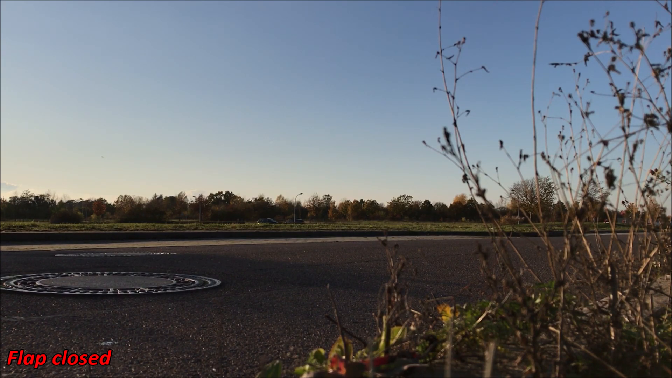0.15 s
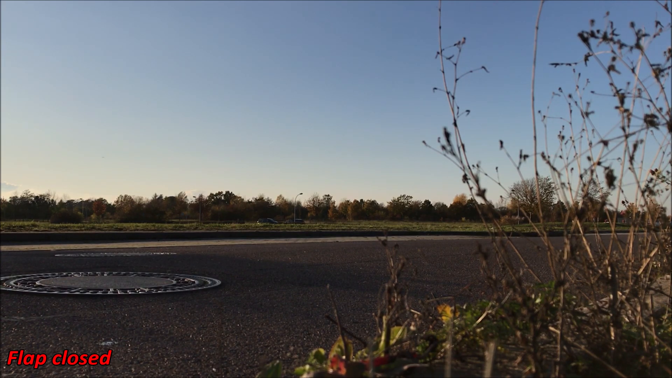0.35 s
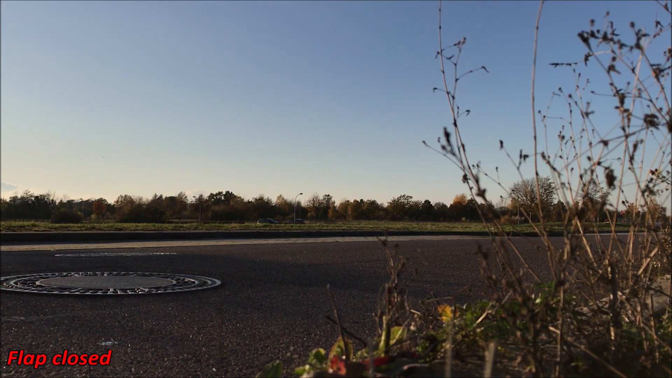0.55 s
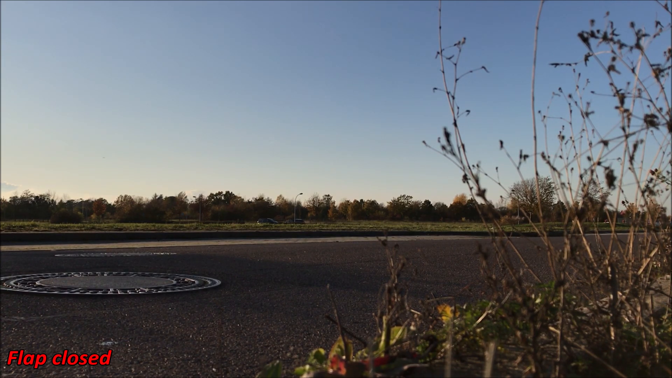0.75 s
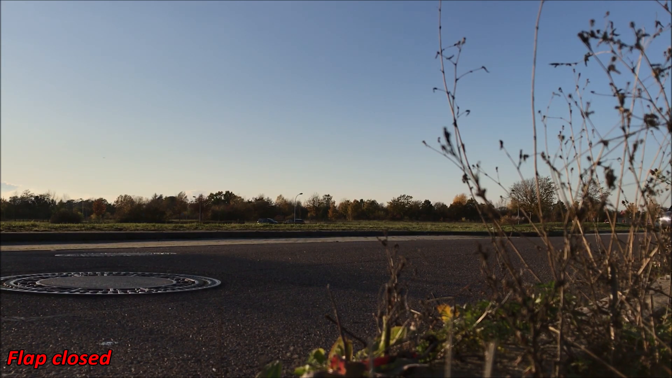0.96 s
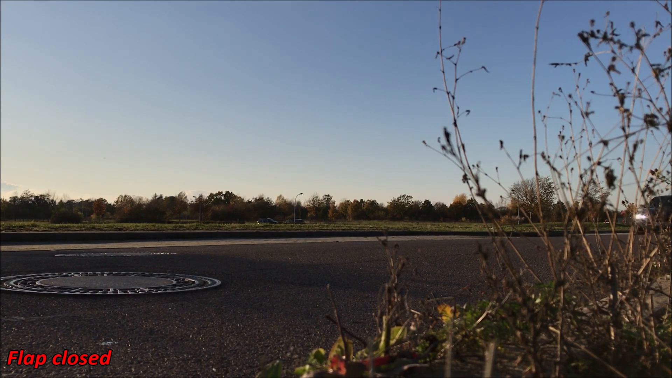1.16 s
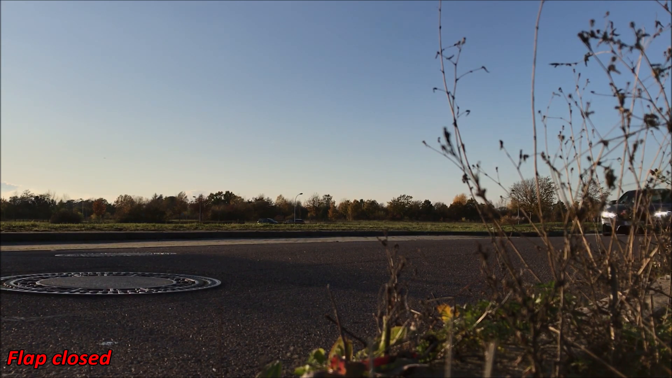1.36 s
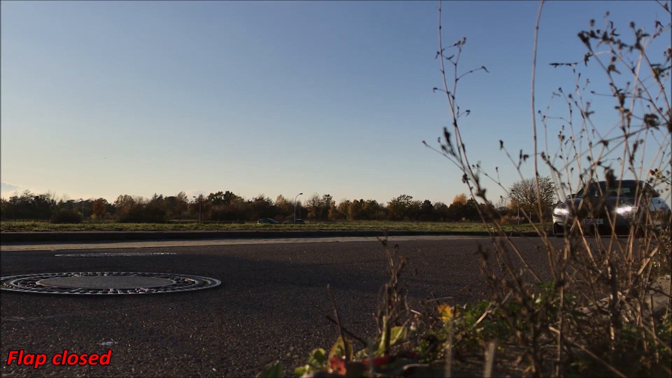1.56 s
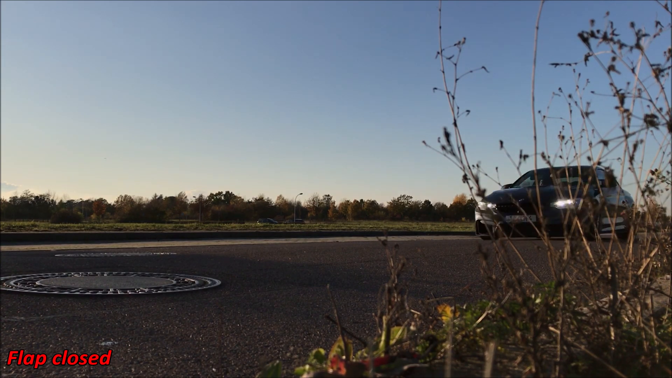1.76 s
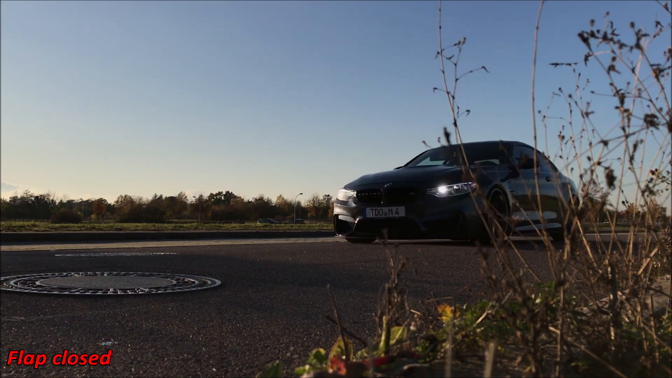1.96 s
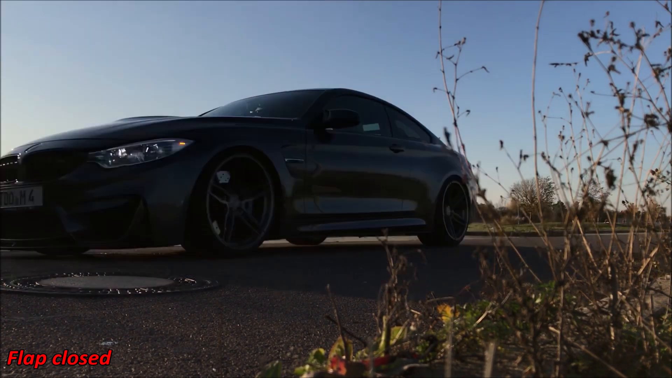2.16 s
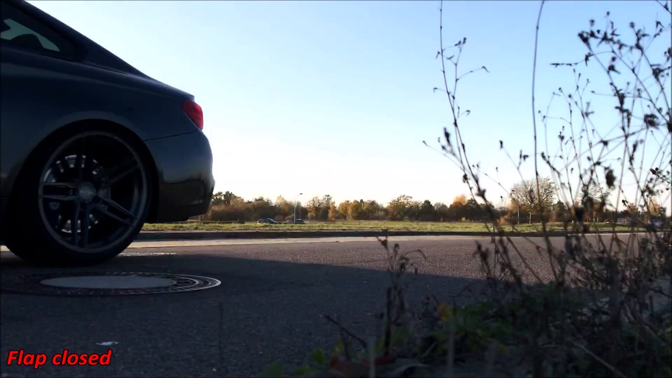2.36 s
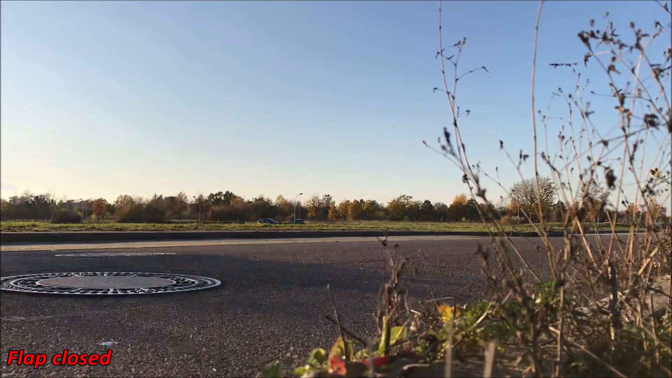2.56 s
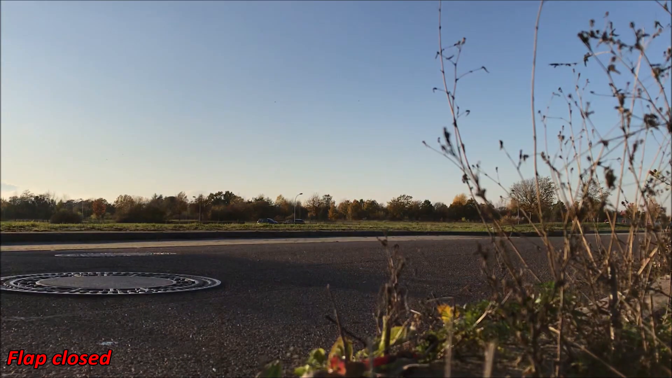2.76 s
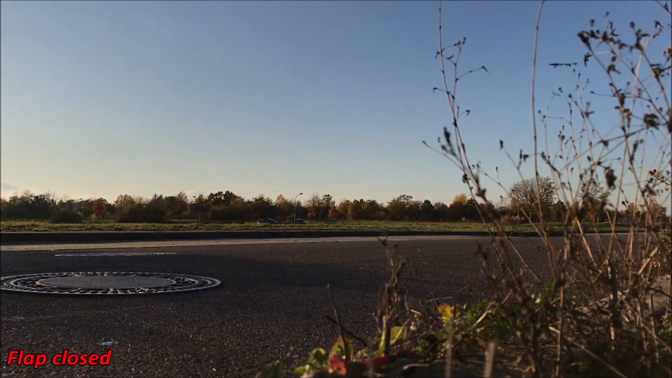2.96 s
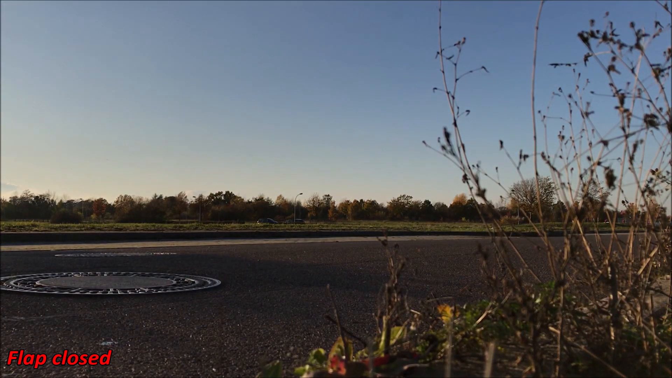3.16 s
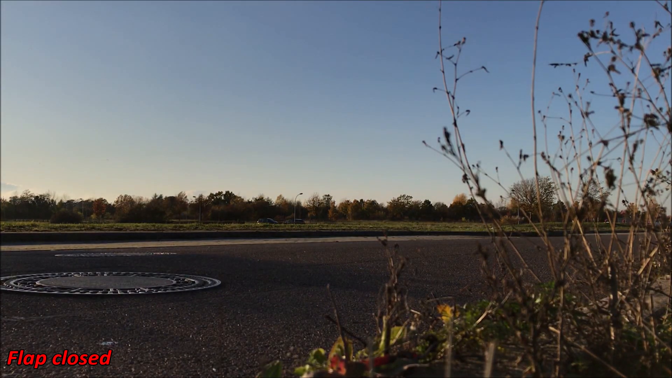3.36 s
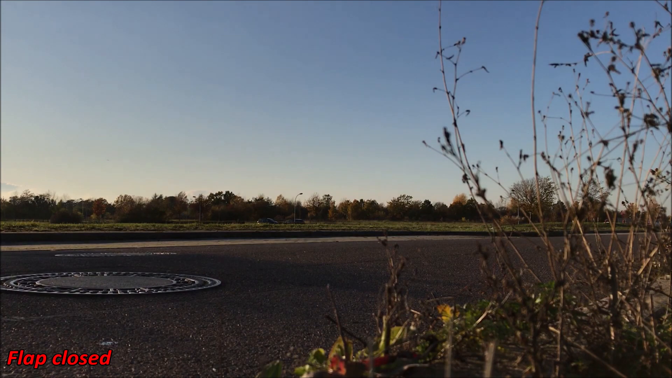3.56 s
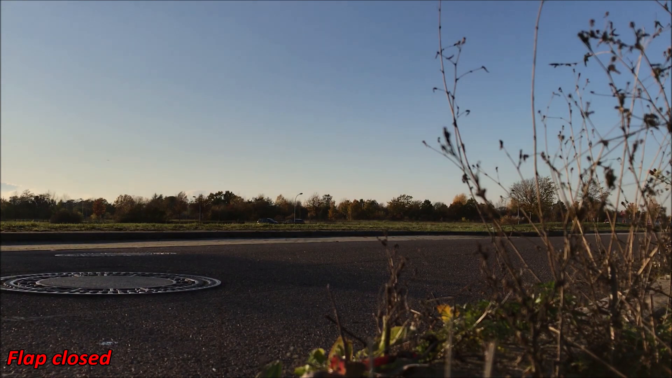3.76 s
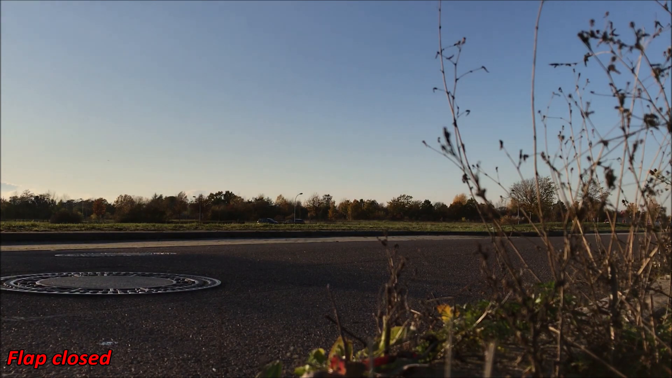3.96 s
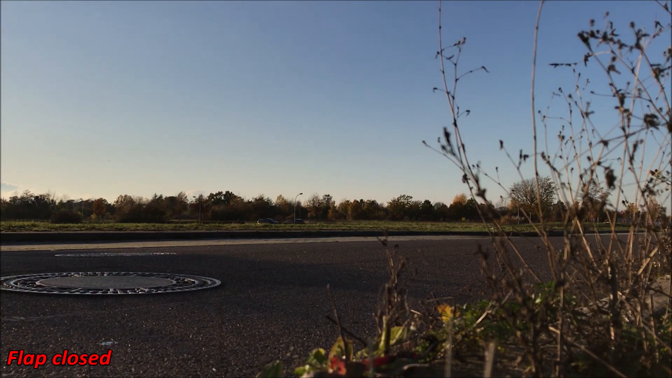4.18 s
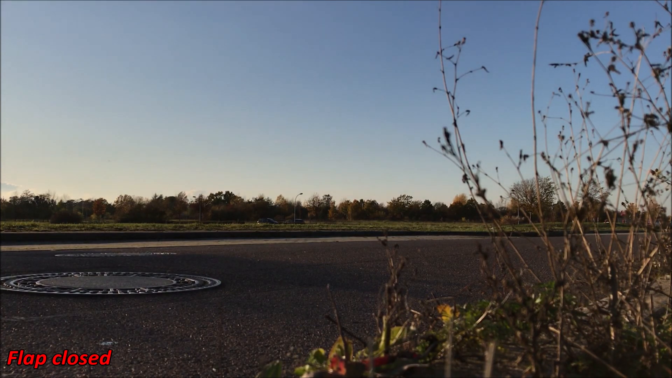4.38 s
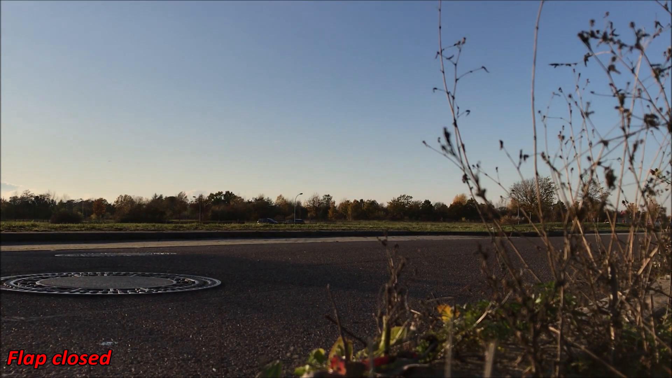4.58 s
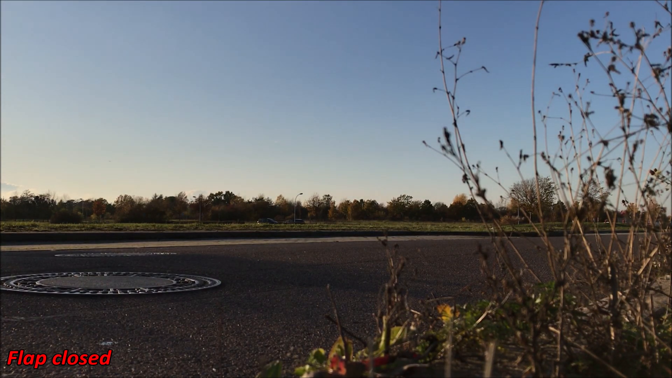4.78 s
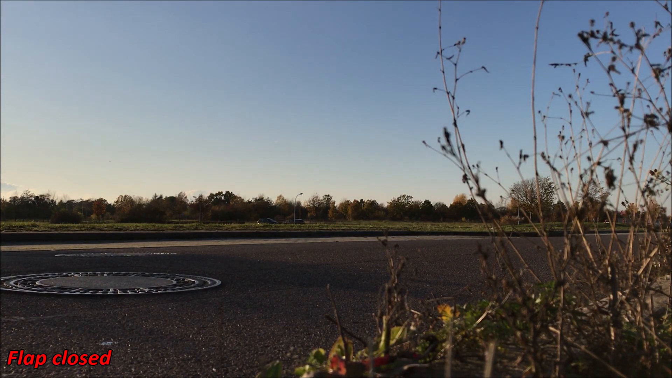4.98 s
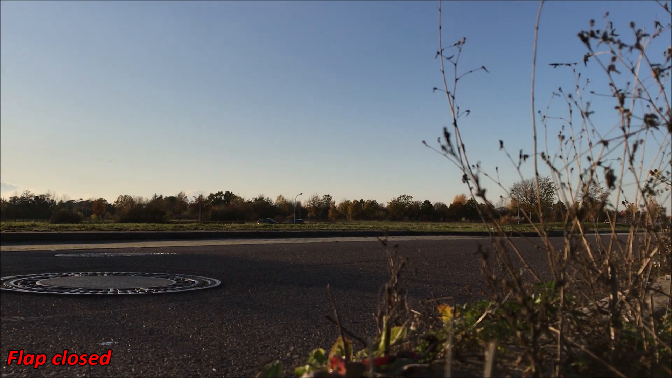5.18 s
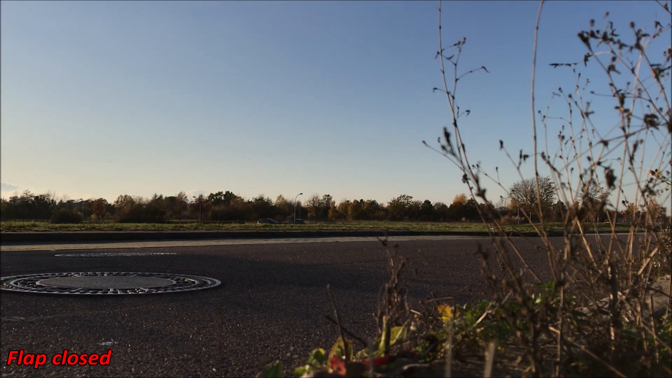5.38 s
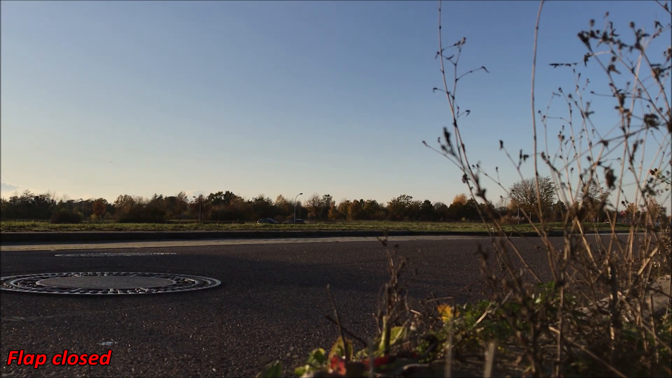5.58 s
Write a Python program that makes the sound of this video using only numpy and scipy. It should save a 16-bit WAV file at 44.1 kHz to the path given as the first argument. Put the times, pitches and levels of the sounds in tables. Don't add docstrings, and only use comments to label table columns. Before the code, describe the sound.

Beside an open road, a low mic hears a sports car approach with a muffled engine hum, briefly under throttle, then coasting. Tyre roar swells and rushes past at about two seconds with a thump of air, the exhaust booms and rasps as the tail turns toward us, and the pitch sinks steadily. In the distance a sudden throttle blip barks and crackles, then the engine fades into quiet weeds with faint insects.

```python
import sys
import numpy as np
from scipy import signal
from scipy.fft import rfft, irfft
from scipy.io import wavfile
from scipy.ndimage import uniform_filter1d

SR = 44100
rng = np.random.default_rng(int(sys.argv[2]) if len(sys.argv) > 2 else 0)


def voltage_ratio(decibels):
    exponent = np.asarray(decibels, float) / 20
    return 10 ** exponent


def wrap_up_sound(samples):
    columns = np.atleast_2d(samples).T
    tamed = np.clip(columns, -1, 1)
    steps = np.round(tamed * 32767).astype(np.int16)
    wavfile.write(sys.argv[1], SR, steps)


N = 248283
T = np.arange(N) / SR

# (time [s], pulse rate as heard [Hz], boom level [dB])
COAST = [(0, 104.1, -25.5), (.1, 104.9, -22), (.28, 107.5, -22), (.39, 104, -19), (.52, 107.3, -30.5),
         (.9, 107.2, -26), (1.24, 101.6, -25), (1.9, 91, -21), (2.27, 85.06, -18), (2.5, 80, -9.5),
         (2.79, 71.6, -12.5), (3.06, 64.9, -25), (3.21, 62.24, -18.5), (3.4, 59.17, -22),
         (3.75, 53.03, -26.5), (4.33, 44.39, -23.5), (4.53, 42.25, -32)]
# (time [s], pulse rate as heard [Hz], boom level [dB])
DOWNSHIFT = [
    (4.595, 42.6, -38),
    (4.63, 46.66, -12.5),
    (4.672, 53.67, -11),
    (4.751, 56.82, -10),
    (4.91, 51.28, -36),
    (5.02, 48.92, -35.5),
    (5.298, 48.06, -35),
    (5.578, 38.77, -41.5),
]
# (frequency [Hz], gain [dB])
MUFFLER = [(30, -42.5), (46, -37.5), (54, -8.5), (62, -1.5), (80, 2.5), (105, -3.5), (125, -11.5),
           (160, -17.5), (240, -19.5)]
# (frequency [Hz], gain [dB])
TAILPIPE_FLOOR = [(110, -20), (150, -16), (190, -12), (230, -12), (270, -20), (440, -17), (490, -18),
                  (540, -24), (900, -34)]
# (frequency [Hz], level [dB])
FLOW = [(110, -22), (170, -14), (240, -9), (310, -1), (345, -4), (395, 0), (435, -6), (480, -16),
        (700, -26), (1500, -60)]
# (time [s], half length [s], rasp level [dB], upper mode level [dB])
RASP_SWELLS = [(.95, .2, 4, 8), (1.6, .15, 3, -10), (2.45, .08, 3, -4), (2.73, .11, 5, 12),
               (2.93, .05, -4, -2), (3.06, .06, 4, 12), (3.155, .025, -8, -2), (3.23, .06, 6, 12),
               (3.54, .12, 2, 15), (4.0, .22, 3, 8), (4.93, .07, 4, 8)]
# (frequency [Hz], density [dB per Hz])
ROAR = [(260, -25.5), (450, -10), (620, -1.5), (800, -0.5), (980, 3), (1200, -0.5), (1500, -4), (1900, -9),
        (2500, -14), (3400, -18.5), (4600, -27), (6200, -29), (9000, -40), (16500, -54.5)]
# (time [s], half length [s], level [dB])
ROAR_ECHOES = [
    (1.45, .2, 1),
    (2.47, 0.098, 2.5),
    (3.42, 0.29, 2.5),
]
# (frequency [Hz], density [dB per Hz])
RUMBLE = [(20, -32), (35, -27.5), (60, 30.5), (100, 26), (140, 18.5), (200, 15), (300, 21.5), (500, -72),
          (1200, -74)]
# (time [s], half length [s], level [dB])
GUSTS = [
    (.89, 0.063, 4),
    (1.04, 0.079, 5),
    (1.2, 0.13, 7),
    (2.43, 0.12, 19.5),
    (4.62, 0.11, 5),
    (4.98, 0.049, 7.5),
]
# (centre frequency [Hz], width [Hz], rate [ticks per s], level [dB])
INSECTS = [
    (12800, 920, 50, -78.5),
    (15000, 1600, 70, -76.5),
    (13800, 900, 25, -90),
    (8700, 2200, 12, -85.5),
]
# (time [s], frequency [Hz], level [dB])
TRILL = [
    (5.1, 6250, -95),
    (5.14, 6220, -79),
    (5.3, 6100, -77),
    (5.42, 5950, -84),
    (5.5, 5900, -97),
]
# (time [s], level [dB], centre frequency [Hz], width [Hz], 60 dB decay time [s])
CRACKS = [
    (3.844, -53.5, 5906, 7123, 0.15),
    (4.6, -53.5, 4560, 4015, .03),
    (4.62, -37, 1197, 1980, 0.037),
    (4.759, -51, 6900, 2470, 0.01),
    (4.964, -50, 1730, 2000, 0.043),
]
# (centre of first gap [s], overlapping gaps, lost above [Hz], band that survives [Hz])
DROPOUTS = [(.66, 1, 4900, 0), (1.237, 1, 3900, 5500), (1.365, 1, 7400, 0), (1.597, 1, 7400, 0),
            (2.239, 1, 7000, 5300), (2.387, 1, 3900, 0), (2.429, 3, 4700, 5450), (2.538, 1, 4200, 0),
            (2.772, 1, 4500, 0), (2.812, 2, 4300, 8700), (2.922, 1, 4200, 6500), (3.18, 1, 3900, 0),
            (3.327, 1, 3900, 0), (3.884, 1, 2500, 6000), (3.947, 2, 4200, 6300), (4.117, 1, 4800, 6500),
            (4.903, 1, 3900, 15000), (5.034, 1, 3900, 15000)]

PASS_S, SPEED_M_S, GAP_M = 2.298, 11.24, 2.75
TURN_S, TURN_TAKES_S = 2.66, 0.21
LIFT_S, LIFT_TAKES_S = 0.6, 0.15
BLIP_S, BLIP_RISE_S, BLIP_HOLD_S, BLIP_FALL_S = 4.6, 0.025, 0.14, 0.14


def evened(x):
    return x / np.sqrt(np.mean(x ** 2) + 1e-20)


def curves(rows):
    s, *columns = np.transpose(rows)
    return [np.interp(T, s, c) for c in columns]


def bumps(rows):
    s, half_s, *columns = np.transpose(rows)
    bells = np.exp(-((T[:, None] - s) / half_s) ** 2)
    return [bells @ db for db in columns]


def step(s, takes_s):
    return 0.5 + 0.5 * np.tanh((T - s) / takes_s)


def wander(seconds):
    width = int(seconds * SR)
    smooth = uniform_filter1d(rng.standard_normal(N), width)
    return evened(uniform_filter1d(smooth, width))


def colour(points, hz):
    f, db = np.transpose(points)
    return np.interp(np.log(hz + 1), np.log(f), db, left=-90, right=-90)


def band(x, hz, width):
    turn = np.exp(2j * np.pi * np.cumsum(hz * np.ones(len(x))) / SR)
    r = np.exp(-np.pi * width / SR)
    smooth = signal.lfilter([(1 - r) ** 2], [1, -2 * r, r * r], x / turn)
    return 2 * (turn * smooth).real


def noise(points, patchy_db, tilt_db=None):
    frames, hz = N // 256 + 5, np.fft.rfftfreq(1024, 1 / SR)
    a, b, patches = rng.standard_normal((frames, 513, 3)).T
    patches = uniform_filter1d(patches, 10, axis=0)
    patches = evened(uniform_filter1d(patches, 12, axis=1))
    level_db = colour(points, hz)[:, None] + patchy_db * patches
    if tilt_db is not None:
        share = np.clip(np.log(hz / 1500 + 1e-9) / np.log(4), 0, 1.3)
        frame_starts = np.minimum(np.arange(frames) * 256, N - 1)
        level_db = level_db + share[:, None] * tilt_db[frame_starts]
    spectrum = (a + 1j * b) * voltage_ratio(level_db)
    return evened(signal.istft(spectrum, nperseg=1024, noverlap=768)[1][:N])


def beyond_m():
    return np.hypot(SPEED_M_S * (T - PASS_S), GAP_M) - GAP_M


def loss_db():
    ground_db_per_m = 0.33
    return 20 * np.log10(1 + beyond_m() / GAP_M) + ground_db_per_m * beyond_m()


def blip():
    times = np.cumsum([BLIP_S, BLIP_RISE_S, BLIP_HOLD_S, BLIP_FALL_S])
    return np.interp(T, times, [0, 1, 1, 0])


def mode(hz, centre_hz):
    return 1 / (1 + (2 * (hz - centre_hz) / 54) ** 2) ** 1.5


def tailpipe():
    rear = step(TURN_S, TURN_TAKES_S)
    early = 1 - step(LIFT_S, LIFT_TAKES_S)
    load = early + blip()
    gone_s = np.maximum(T - TURN_S, 0)
    swell_db, upper_swell_db = bumps(RASP_SWELLS)

    front_db, rear_db = -28, -12.5
    rasp_db = front_db + rear * (rear_db - front_db) - loss_db() + swell_db + 12 * early + 11 * blip()

    front_hz, rear_hz, load_hz, sag_hz_per_s = 288, 302.3, 27, 127
    cooling_s = np.maximum(T - BLIP_S - BLIP_HOLD_S - BLIP_FALL_S, 0)
    lower_hz = front_hz + rear * (rear_hz - front_hz) + load_hz * load - sag_hz_per_s * cooling_s

    upper_front_db, upper_rear_db, fade_db_per_s, load_db = -14, 10, 11.5, 19
    upper_db = (upper_front_db + rear * (upper_rear_db - upper_front_db) - fade_db_per_s * gone_s
                + load_db * load + upper_swell_db)

    clean_front, clean_rear, clean_far, clean_fade_s, clean_load = 0.3, 0.95, 0.5, 1.1, 0.38
    behind = clean_far + (clean_rear - clean_far) * np.exp(-(gone_s / clean_fade_s) ** 2)
    clean = np.clip(clean_front + rear * (behind - clean_front) + clean_load * load, 0, 1)
    return rasp_db, lower_hz, upper_db, clean


def boom(hz, boom_db, turns):
    first_db = boom_db + colour(MUFFLER, hz) - 30 * step(BLIP_S, BLIP_RISE_S)
    load_db = 6.5 * (1 - step(LIFT_S, LIFT_TAKES_S))
    front_db = (-3 + 2.5 * wander(0.043)) * (1 - step(TURN_S, TURN_TAKES_S))
    second_db = boom_db + colour(MUFFLER, 2 * hz) + load_db + front_db
    first = voltage_ratio(first_db) * np.cos(2 * np.pi * turns)
    second = voltage_ratio(second_db) * np.cos(4 * np.pi * turns)
    return np.sqrt(2) * (first - second)


def rasp(hz, turns):
    rasp_db, lower_hz, upper_db, clean = tailpipe()
    upper_hz = 379.3
    orders, power = np.zeros(N), np.zeros(N)
    for k in range(3, 16):
        modes = mode(k * hz, lower_hz) + voltage_ratio(upper_db) * mode(k * hz, upper_hz)
        between = voltage_ratio(colour(TAILPIPE_FLOOR, k * hz) + 0.8 * np.maximum(upper_db, 0))
        paired = voltage_ratio(-6 * (k % 2) * (T > 4.6) * (T < 4.9))
        gain = (modes + between) * paired * voltage_ratio(1.3 * wander(0.12))
        orders += gain * np.cos(2 * np.pi * k * (turns + 0.5) + 2 + 0.4 * wander(0.2))
        power += gain ** 2 / 2
    flow = noise(FLOW, patchy_db=1.5) * (1 + 0.48 * np.cos(2 * np.pi * turns))
    return voltage_ratio(rasp_db) * (np.sqrt(clean) * orders / np.sqrt(power) + np.sqrt(1 - clean) * flow)


def exhaust():
    hz, boom_db = curves(COAST + DOWNSHIFT)
    turns = np.cumsum(hz * (1 + 0.00339 * wander(0.0307))) / SR
    return boom(hz, boom_db, turns) + rasp(hz, turns) + crackle(turns)


def road():
    rear = step(TURN_S, TURN_TAKES_S)
    front_treble_db = -7.5 - 0.2543 * beyond_m()
    rear_treble_db = -19.5 + 0.17 * beyond_m()
    treble_db = (1 - rear) * front_treble_db + rear * rear_treble_db
    roar = noise(ROAR, patchy_db=0.83, tilt_db=treble_db + 14.0)
    roar = roar / np.sqrt(uniform_filter1d(band(roar, 914, 3270) ** 2, 11000))
    roar_db = -20.5 - loss_db() + bumps(ROAR_ECHOES)[0] + 0.29 * wander(0.0037)

    wake_s, rise_db_per_s, fall_db_per_s = 2.375, 36, 18.5
    wake_db = -42.5 - np.maximum(rise_db_per_s * (wake_s - T), fall_db_per_s * (T - wake_s))
    wake = voltage_ratio(wake_db + 0.99 * wander(0.0062)) * band(rng.standard_normal(N), 11180, 12000)

    rumble_db = -40 - 0.2 * T + bumps(GUSTS)[0]
    rumble = voltage_ratio(rumble_db) * noise(RUMBLE, patchy_db=2.5)
    return voltage_ratio(roar_db) * roar + wake + rumble


def weeds():
    out = voltage_ratio(-76) * rng.standard_normal(N)
    for hz, width, per_s, db in INSECTS:
        beats = np.cumsum(per_s * voltage_ratio(4 * wander(0.03))) / SR
        ticks = np.diff(np.floor(beats), prepend=0) * voltage_ratio(3 * rng.standard_normal(N))
        bursts = signal.oaconvolve(ticks, np.hanning(220))[:N] * rng.standard_normal(N)
        out += voltage_ratio(db) * evened(band(bursts, hz, width))
    hz, db = curves(TRILL)
    throb = 0.25 + np.maximum(np.cos(2 * np.pi * 48 * T), 0)
    return out + voltage_ratio(db) * evened(throb * band(rng.standard_normal(N), hz, 250))


def cracks():
    out = np.zeros(N)
    for s, db, hz, width, t60 in CRACKS:
        fade = (T > s) * voltage_ratio(db - 60 * np.abs(T - s) / t60)
        out += fade * evened(band(rng.standard_normal(N), hz, width))
    return out


def crackle(turns):
    lag = turns - np.interp(4.7175, T, turns)
    gate = np.exp(-(lag % 1) / 0.07) + 0.8 * np.exp(-((lag - 0.4) % 1) / 0.07) + 0.3
    gate = uniform_filter1d(gate, size=20) * voltage_ratio(2.2 * wander(0.0047))
    spit = np.zeros(N)
    for hz, width, db in [(522, 130, 1.0), (1100, 290, -2.0), (2800, 1800, -9.5), (6040, 3500, -18.5)]:
        spit += voltage_ratio(db) * evened(band(rng.standard_normal(N), hz, width))
    smooth = band(gate * spit, 1500, 6200)
    peak_s, ends_s, swell_db_per_s, dies_db_per_s = 4.715, 4.775, 75, 330
    level_db = -33.5 - swell_db_per_s * abs(T - peak_s) - dies_db_per_s * np.maximum(T - ends_s, 0)
    return voltage_ratio(level_db) * evened(smooth) * step(BLIP_S + BLIP_RISE_S / 2, BLIP_RISE_S / 2)


def scene():
    return (exhaust() + road() + weeds() + cracks())[None]


def housing_echo(x):
    treble = signal.sosfilt(signal.butter(2, 2500, "high", fs=SR, output="sos"), x)
    return x - 0.22 * np.roll(treble, shift=17)


def treble_dropouts(heard):
    x, hz = heard.copy(), np.fft.rfftfreq(4096, 1 / SR)
    for s, count, cut_hz, kept_hz in DROPOUTS:
        start = round(s * SR) - 1024
        stray = np.repeat(rng.random(147) < 0.6, 14)[:len(hz)]
        near_cut = hz > 0.7 * cut_hz
        lost = ((hz > cut_hz) | near_cut & stray) & (abs(hz - kept_hz) > 100)
        ringing = ~lost & near_cut
        missing = np.zeros(4096)
        for k in range(count):
            missing[1024 * k:2048 + 1024 * k] += np.hanning(2048)
        gap = 1 - np.sqrt(np.clip(1 - missing, 0, 1))
        removed = irfft(rfft(heard[start:start + 4096]) * (lost - 0.7 * ringing))
        x[start:start + 4096] -= gap * removed
    return x


def roll_off(x):
    return signal.sosfilt(signal.butter(12, 16090, fs=SR, output="sos"), x)


def record(dry):
    x = treble_dropouts(housing_echo(dry[0]))
    mix = x * np.minimum((T[-1] - T) / 0.004, 1)
    return roll_off(mix[None])


dry = scene()
out = record(dry)
wrap_up_sound(out)
```